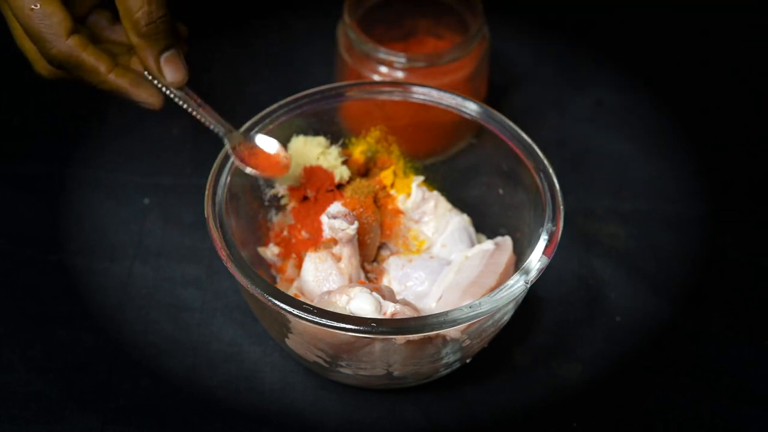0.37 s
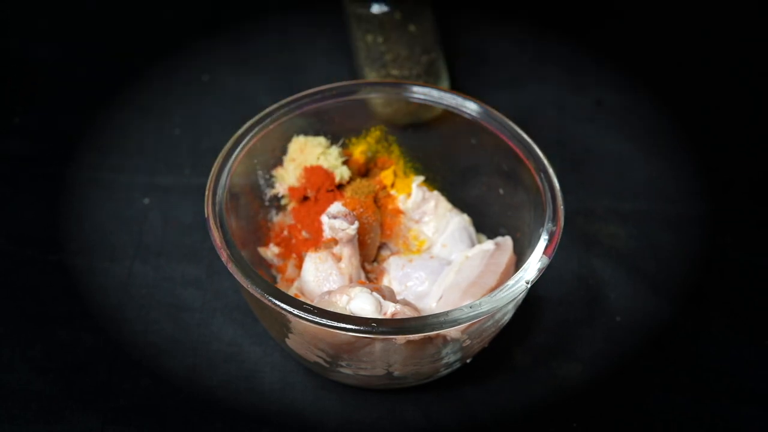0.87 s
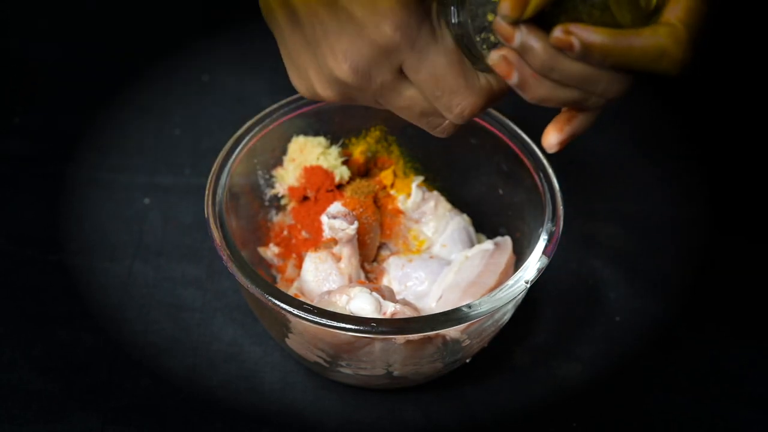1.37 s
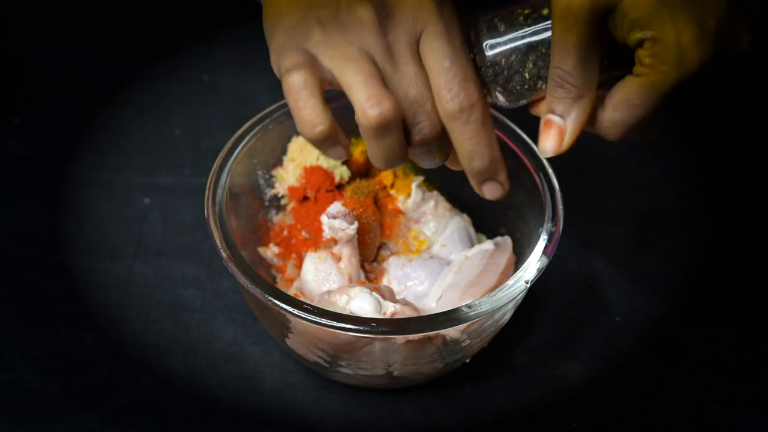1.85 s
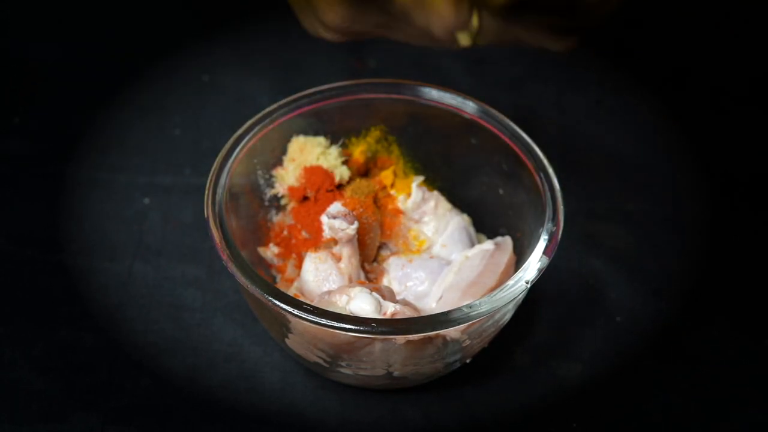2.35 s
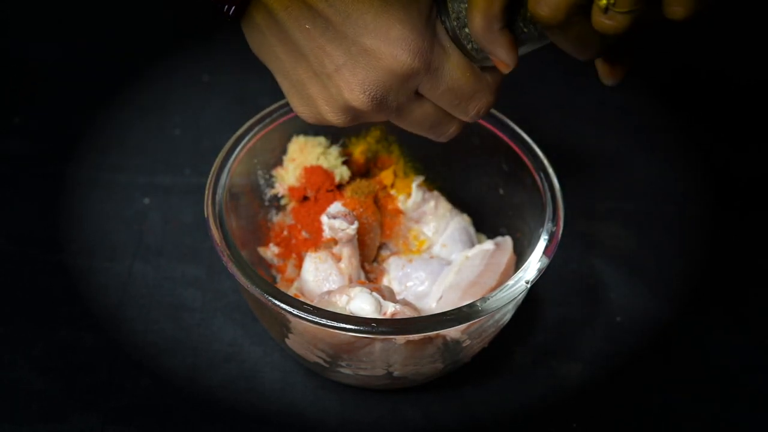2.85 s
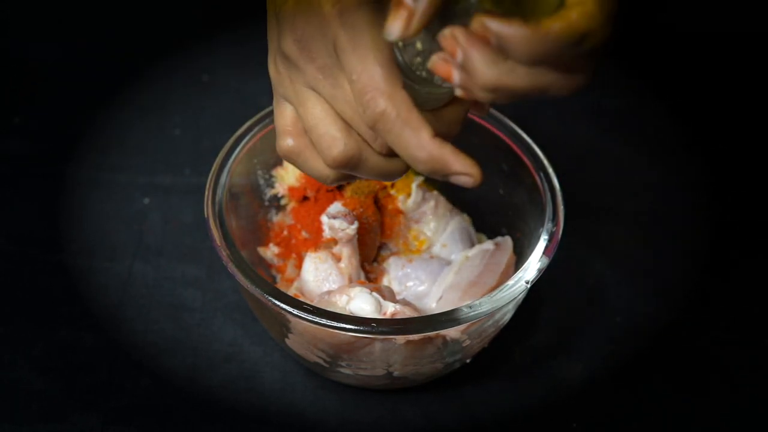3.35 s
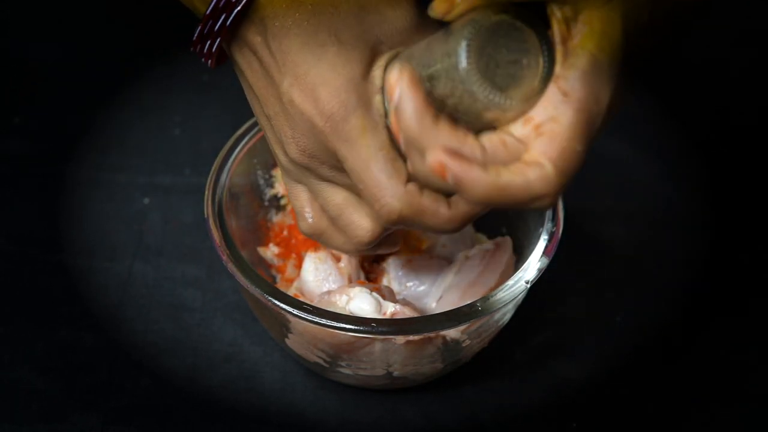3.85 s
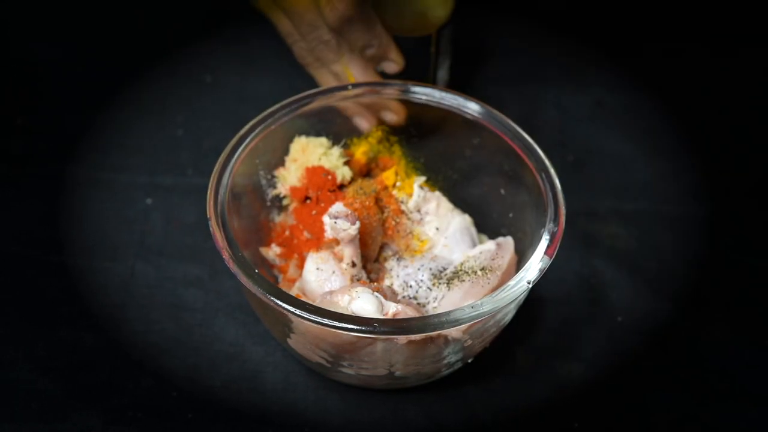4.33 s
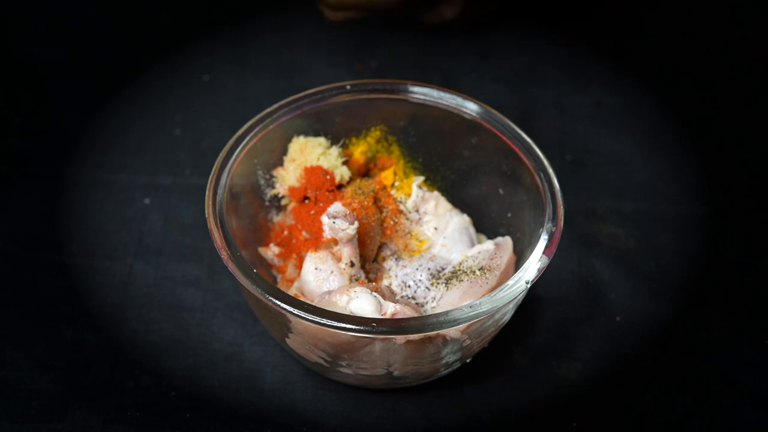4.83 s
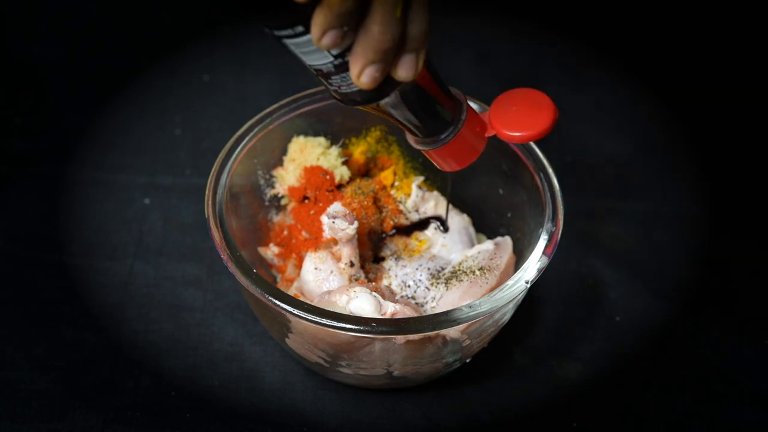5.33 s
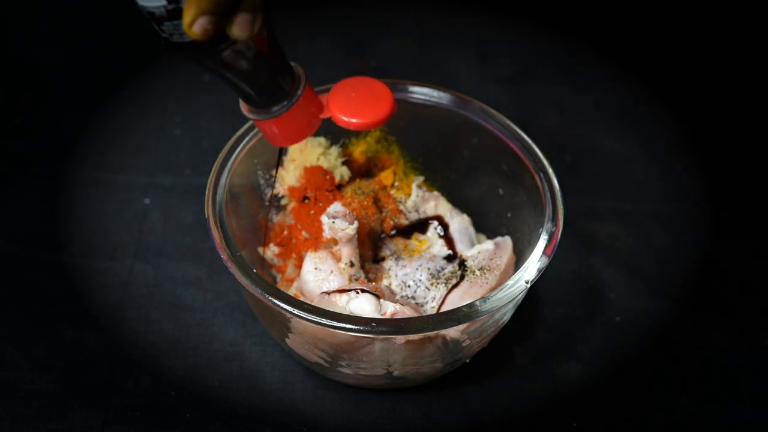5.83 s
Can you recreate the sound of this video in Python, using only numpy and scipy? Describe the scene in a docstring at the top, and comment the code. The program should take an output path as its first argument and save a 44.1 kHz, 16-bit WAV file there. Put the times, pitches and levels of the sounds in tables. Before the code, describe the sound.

In a bare echoing kitchen, glass taps, dull jar thuds, rattling mill knocks with gritty twists, a tiny hoot, cap snaps and a final bowl clink.

```python
"""Seasoning a bowl of meat in a bare, echoing kitchen, in short sections spliced together.
A spoon taps a glass rim, jars thud on the table, then a spice mill is knocked and twisted while bangles
jingle; a short hoot follows, a plastic cap snaps open, and late thuds end with a clink of the bowl.
Struck bodies ring in decaying modes, grains crack at random, the hoot is a few partials; drone and hiss,
both shaped noise, lie below throughout, and the loudest blows overload the input stage."""
import sys
import numpy as np
from scipy import signal
from scipy.fft import rfft, irfft, next_fast_len
from scipy.io import wavfile
from scipy.ndimage import uniform_filter1d

SR = 44100
rng = np.random.default_rng(int(sys.argv[2]) if len(sys.argv) > 2 else 0)


def voltage_ratio(level):
    """Linear amplitude factor for a level in decibels (scalar or array-like)."""
    return 10 ** (np.asarray(level, float) / 20)


def pcm_store(signal):
    """Save signal as 16-bit PCM."""
    levels = np.round(np.clip(np.atleast_2d(signal), -1, 1) * 32767)
    wavfile.write(sys.argv[1], SR, levels.astype(np.int16).T)


N = 273420

# In all blow tables, tilt lifts the high modes (harder contact) and focus lifts the middle ones.
# Knocks on the mill. Each row: time in seconds, level in dB, tilt in dB, focus in dB.
MILL_KNOCKS = [(1.346, -15.5, -5, 8), (1.364, 0.5, -1, 2), (1.434, 6, 4.5, 8.5), (1.449, -1, 1.5, 1),
               (2.053, -11.5, -12, 9), (2.0785, -8.5, -14, 14), (2.102, 5, -1.5, -2.5),
               (2.154, -6.5, 7.5, -0.5), (2.164, 8, -7.5, 9.5), (2.192, 4, 1, -3), (2.2005, -5.5, -10, 1.5),
               (2.236, -1, -6, -2), (2.687, -10.5, 0.5, 13), (2.7235, -9, -3.5, -8.5), (2.731, -2, -4, 3.5),
               (2.782, -16, -12.5, 10), (2.843, -11, -7, -3.5), (3.381, -25, -5, -22),
               (3.454, -14, -2.5, -3.5), (3.489, -3, -7.5, -3), (3.546, -15.5, 0, -5),
               (3.5632, -6.5, 12.5, 11), (3.723, -8.5, -3.5, -9.5), (3.805, 2, 10, -1.5)]
# Modes of the mill. Each row: frequency in Hz, level in dB, t60 in seconds.
MILL_MODES = [(950, 1, 0.012), (1695, 1.5, 0.0061), (2054, -0.5, 0.0085), (2570, -1.5, 0.0048),
              (3270, -6.5, 0.0046), (4255, -7, 0.00217), (5100, -7, 0.0062), (6273, -1, 0.0061),
              (7465, -1, 0.0043), (8340, 1.5, 0.0033), (9330, -3.5, 0.0084), (11340, -5.5, 0.001),
              (14250, 4.5, 0.0046), (14870, -1.5, 0.0033)]
# Average excitation by a knock. Each row: frequency in Hz, level in dB.
MILL_REACH = [(1000, -14.5), (2200, -1), (6200, 0.5), (13000, -10)]


def mill_knocks():
    """A knock rings the mill; its loose parts rebound and the grip detunes its modes."""
    return struck(MILL_KNOCKS, MILL_MODES, MILL_REACH, crack_db=-3, scatter=0.02, rattle_s=0.0022)


# Twists of the mill. Each row: start in seconds, hold in seconds, level in dB.
TWISTS = [(1.80, 0.01, -52), (2.09, 0.022, -42.5), (2.198, 0.34, -45), (2.726, .06, -35),
          (2.846, 0.0145, -34.5), (2.973, 0.077, -50.5), (3.386, 0.061, -46), (3.729, 0.093, -36.5)]
# Average excitation of the mill by a grain. Each row: frequency in Hz, level in dB.
GRAIN_REACH = [(1000, -.5), (2200, 0), (6200, -6), (13000, -0.5)]
GRAINS_PER_S = 500
TWIST_RISE_DB_PER_S, TWIST_FALL_DB_PER_S = 598, 349


def grinding():
    """Grains of uneven size crack at random and ring the mill in one of four ways; twists swell and die."""
    sizes = voltage_ratio(4.5 * np.minimum(rng.exponential(1, N), 4)) * rng.choice([-1, 1], N)
    clicks = sizes * (rng.random(N) < GRAINS_PER_S / SR)
    dealt = rng.integers(0, 4, N)
    grains = np.zeros(N)
    for k in range(4):
        ringing = ring(MILL_MODES, GRAIN_REACH, crack_db=0.85, crack_hz=10000, scatter=0.049, split=0)
        grains += signal.fftconvolve(clicks * (dealt == k), ringing)[:N]
    effort = sum(voltage_ratio(swell(*twist, TWIST_RISE_DB_PER_S, TWIST_FALL_DB_PER_S)) for twist in TWISTS)
    return effort * grains / grains.std()


# Taps of the spoon. Each row: time in seconds, level in dB, tilt in dB, focus in dB.
SPOON_TAPS = [(0.115, -7.5, -3, -1), (0.139, -9, -5, -18.5), (0.283, 7.5, 1.5, 7), (0.457, 7.5, 0.5, -2)]
# Pitches of the glass rim. Each entry: frequency in Hz.
GLASS_HZ = [899, 2153, 3925, 6113, 7500, 8656, 9700, 10150, 10790, 11621, 12600, 13300, 14840]
# Ringing at those pitches. Each row: level in dB, t60 in seconds.
GLASS_RINGING = [(-13.5, .6), (0, 0.18), (2, 0.088), (-0.5, 0.16), (-2, 0.0075), (0, 0.1), (-1, 0.005),
                 (-7.5, 0.06), (-6, 0.099), (-6, 0.15), (0.5, 0.0046), (-17.5, 0.03), (-12.5, 0.13)]
# Average excitation by a tap. Each row: frequency in Hz, level in dB.
SPOON_REACH = [(2200, -6.5), (3900, -1.5), (6100, -4), (11000, 2)]


def spoon_taps():
    """A tap rings the glass rim, whose split modes beat."""
    return struck(SPOON_TAPS, np.column_stack([GLASS_HZ, GLASS_RINGING]), SPOON_REACH, crack_db=-5, split=0.003)


# Jars set on the table. Each row: time in seconds, level in dB, tilt in dB, focus in dB.
THUDS = [(0.73, -5.5, -1, -1.5), (0.884, -1.5, -2, -2), (4.165, -15, -6.5, 3), (5.9765, -6.5, 3, 15),
         (6.009, -13, 5, 11)]
# Modes of the table. Each row: frequency in Hz, level in dB, t60 in seconds.
TABLE_MODES = [(129.6, -7.5, 0.075), (222, -6.5, 0.095), (306.7, 2, 0.094), (410.7, 6, 0.053),
               (637, 9.5, 0.016), (893, 6.5, 0.013), (1525, 9, 0.004), (2446, 7.5, 0.0021),
               (4330, 6, 0.00051)]
# Average excitation by a thud. Each row: frequency in Hz, level in dB.
THUD_REACH = [(300, -12), (800, -6.5), (2200, 3.5)]


def thuds():
    """A jar excites the low modes of the table with a dull crack."""
    return struck(THUDS, TABLE_MODES, THUD_REACH, crack_db=-13, crack_hz=3500, scatter=0.03)


# Snaps of the cap. Each row: time in seconds, level in dB, tilt in dB, focus in dB.
CAP_SNAPS = [(4.6995, 2.5, -5.5, -0.5), (4.860, 6.5, -7.5, 8.5), (4.9128, 11, 7.5, -3)]
# Modes of the plastic cap. Each row: frequency in Hz, level in dB, t60 in seconds.
CAP_MODES = [(1170, 1, 0.0051), (1585, -8.5, 0.023), (2400, -0.5, 0.0024), (3600, -3.5, 0.0029),
             (4575, 1.5, 0.0065), (5000, -0.5, 0.0078), (5524, 0, 0.0077), (6450, -6.5, 0.011),
             (7200, -2, 0.0027), (9800, -1, 0.014), (13000, -12.5, .008)]
# Average excitation by a snap. Each row: frequency in Hz, level in dB.
CAP_REACH = [(1500, -11), (4500, -3), (5700, -6.5), (10000, -23)]


def cap_snaps():
    """A snap sets off the short modes of the plastic cap."""
    return struck(CAP_SNAPS, CAP_MODES, CAP_REACH, crack_db=-6, scatter=0.018)


# Strokes of the bangles. Each row: time in seconds, level in dB, tilt in dB, focus in dB.
JINGLES = [(0.892, -20.5, -2, -2.5), (1.8113, -17.5, -9, 8.5), (1.8632, -21.5, -14.5, 12),
           (2.386, -21, 19.5, -3), (2.5304, -17, -6.5, 7.5), (2.7915, -10.5, -4, -13),
           (2.806, -13.5, -2, -3.5), (2.88, -16, 1, -14), (3.1111, -24.5, -12, 15), (3.2051, -22, -12, 11),
           (3.7778, -20.5, 12, -8), (3.963, -33.5, 1, 13), (4.3021, -32.5, -1.5, -17)]
# Modes of the bangles. Each row: frequency in Hz, level in dB, t60 in seconds.
BANGLE_MODES = [(6370, 3.5, 0.0037), (9240, -5.5, 0.0123), (13470, -4.5, 0.035), (14830, -3, 0.03),
                (15400, -4.5, 0.024)]
# Average excitation by a jingle. Each row: frequency in Hz, level in dB.
BANGLE_REACH = [(9200, -1), (13400, 3), (14600, -14)]


def jingles():
    """Bangles ring in a few high modes under a strong crack."""
    return struck(JINGLES, BANGLE_MODES, BANGLE_REACH, crack_db=1.5, scatter=0.0041)


# Clink of the bowl. Each row: time in seconds, level in dB, tilt in dB, focus in dB.
BOWL_CLINKS = [(6.0215, -6.5, 1, 0)]
# Modes of the bowl. Each row: frequency in Hz, level in dB, t60 in seconds.
BOWL_MODES = [(2640, -7, 0.014), (4840, -6, 0.009), (6350, -4, 0.0049), (7380, -10, .004),
              (8970, -15.5, 0.006), (12120, -11.5, .006), (14800, -18, .008), (15000, -19, .008)]
# Average excitation by a clink. Each row: frequency in Hz, level in dB.
BOWL_REACH = [(2700, 0), (14000, 0)]


def bowl_clinks():
    """A clink rings the short, high modes of the bowl."""
    return struck(BOWL_CLINKS, BOWL_MODES, BOWL_REACH, crack_db=-2)


CRACK_FOLLOWS_TILT = 0.27   # dB per dB: a softer contact cracks less


def struck(blows, modes, reach, crack_db, crack_hz=13000, scatter=0, split=0, rattle_s=0):
    """Every blow rings the same body; its tilt and focus colour the modes."""
    out = np.zeros(2 * N)
    hz, usual_db = np.transpose(reach)
    place = np.linspace(-1, 1, len(hz))
    for s, level_db, tilt_db, focus_db in blows:
        colour = list(zip(hz, usual_db + tilt_db * place + focus_db * (1 - place ** 2)))
        blow_crack_db = crack_db + CRACK_FOLLOWS_TILT * min(tilt_db, 0)
        wave = ring(modes, colour, blow_crack_db, crack_hz, scatter, split)
        if rattle_s:
            wave = rattle(wave, rattle_s)
        out[round(s * SR):][:len(wave)] += voltage_ratio(level_db) * wave
    return out[:N]


def ring(modes, colour, crack_db, crack_hz, scatter, split):
    """Decaying modes plus the short crack of contact; a small body sends out little below its modes."""
    hz, level_db, t60_s = np.transpose(modes)
    t = np.arange(int(max(t60_s) * SR) + 400) / SR
    gains = voltage_ratio(level_db + at_hz(colour, hz)) * (-1) ** np.arange(len(hz))
    hz = hz * (1 + scatter * rng.standard_normal(len(hz)))
    turns = 2 * np.pi * np.outer(hz, t)
    # uneven round bodies split their modes, which then beat
    beats = 1 + 0.8 * np.cos(split * rng.random((len(hz), 1)) * turns)
    body = gains @ (np.sin(turns) * beats * voltage_ratio(-60 * np.outer(1 / t60_s, t)))
    crack = signal.lfilter(*signal.butter(2, crack_hz, fs=SR), rng.standard_normal(len(t)))
    wave = body / np.abs(body).max() + voltage_ratio(crack_db - 60 * t / 0.0028) * crack
    return signal.sosfilt(signal.butter(3, 0.94 * hz[0], "high", fs=SR, output="sos"), wave)


REBOUND = 0.72   # all-pass gain: the higher, the more the first touch stands out


def rattle(wave, longest_s):
    """Loose parts rebound: two all-passes spread the blow in time and keep its colour."""
    for gap in (longest_s * SR * rng.uniform(0.3, 1, size=2)).astype(int):
        touch = np.r_[REBOUND, np.zeros(gap), -1]
        wave = signal.lfilter(touch, -touch[::-1], wave)
    return wave


def swell(start_s, hold_s, level_db, rise_db_per_s, fall_db_per_s):
    """Level in dB that climbs to its top, holds and sinks."""
    t = np.arange(N) / SR
    rise = rise_db_per_s * np.maximum(start_s - t, 0)
    return level_db - rise - fall_db_per_s * np.maximum(t - start_s - hold_s, 0)


def at_hz(points, hz):
    """Reads a (Hz, value) table on a log-frequency axis."""
    points_hz, values = np.array(points).T
    return np.interp(np.log(hz), np.log(points_hz), values)


# Partials of the hoot. Each row: multiple of HOOT_HZ, level in dB.
HOOT_PARTIALS = [(2, 0), (3, -13), (4, -5.5), (5, -9)]
HOOT_HZ, HOOT_WAVER = 583, 0.009   # waver: share of the pitch
HOOT_START_S, HOOT_HOLD_S, HOOT_DB = 4.07, 0.15, -46
HOOT_RISE_DB_PER_S, HOOT_FALL_DB_PER_S = 2001, 333


def hoot():
    """A few partials of one slightly wavering pitch."""
    waver = uniform_filter1d(rng.standard_normal(N), size=900) * 30   # back to about unit rms
    phase = 2 * np.pi * np.cumsum(HOOT_HZ * (1 + HOOT_WAVER * waver)) / SR
    tone = sum(voltage_ratio(db) * np.sin(round(k) * phase) for k, db in HOOT_PARTIALS)
    return voltage_ratio(swell(HOOT_START_S, HOOT_HOLD_S, HOOT_DB, HOOT_RISE_DB_PER_S, HOOT_FALL_DB_PER_S)) * tone


# Splices between the sections. Each entry: time in seconds.
SPLICES_S = [.035, .702, 1.32, 2.67, 4.062, 4.6, 5.28, 5.955]
# Sections, each with its own room level, lean, drone and hiss. Each row: room gain in dB, left-right lean in
# dB, drone level in dB rms, hiss level in dB rms.
SECTIONS = [(-1.5, .4, -42.5, -49.5), (-2.5, 0, -46.5, -77), (-5, 0, -44.5, -71.5), (-2, -1, -45.5, -47),
            (-2.5, -0.8, -48, -45.5), (-1, -0.3, -40.5, -69.5), (-4.5, -0.3, -41.5, -45),
            (2, 1.1, -55.5, -39.5), (1.5, -1, -49, -58)]
# Spectrum of the dull drone. Each row: frequency in Hz, relative density in dB.
DRONE_COLOUR = [(30, -17), (200, -20), (400, -16), (800, -1), (1500, -0.5), (3000, -11), (6000, -19.5),
                (16000, -35)]
# Spectrum of the brighter hiss. Each row: frequency in Hz, relative density in dB.
HISS_COLOUR = [(40, -21.5), (250, -25.5), (500, -15.5), (900, -4), (2000, -3.5), (3400, -9), (6200, -17),
               (7300, -10.5), (8600, -17.5), (16000, -35)]


def drone_and_hiss():
    """Two coloured noises whose levels hold through a section and step at each splice."""
    out = np.zeros((2, N))
    section = np.searchsorted(SPLICES_S, np.arange(N) / SR)
    size = next_fast_len(N)
    for colour, level_db in zip((DRONE_COLOUR, HISS_COLOUR), np.transpose(SECTIONS)[2:]):
        hz, noise = stereo_noise(size)
        shaped = irfft(noise * voltage_ratio(at_hz(colour, hz)), size)[:, :N]
        out += uniform_filter1d(voltage_ratio(level_db[section]), size=300) * shaped / shaped.std()
    return out


# Likeness of the two channels. Each row: frequency in Hz, correlation from 0 to 1.
LIKENESS = [(250, 1), (500, 0.93), (1000, 0.7), (2000, 0.043), (8000, 0.0092)]


def stereo_noise(size):
    """Spectra of two white noises, alike in the bass and nearly unrelated in the treble."""
    hz = np.maximum(np.arange(size // 2 + 1) * SR / size, 10)
    mid, side = rfft(rng.standard_normal((2, size)))
    alike = np.clip(at_hz(LIKENESS, hz), 0, 1)
    pair = np.sqrt(1 + alike) * mid + np.sqrt(1 - alike) * side * [[1], [-1]]
    return hz, pair / np.sqrt(2)


# Decay of the room. Each row: frequency in Hz, t60 in seconds.
ROOM_T60 = [(100, 0.57), (400, 0.7), (1400, 0.54), (5000, 0.53), (9000, 0.49), (15000, 0.36)]
# Early echoes. Each row: delay in seconds, level in dB.
ECHOES = [(.0078, -3), (.013, -12)]
TAIL_DB, BUILD_UP_S = -23.5, 0.005


def room_response():
    """A few early echoes, plus noise that builds up and dies at its own rate in each octave."""
    size = SR
    t = np.arange(size) / SR
    hz, noise = stereo_noise(size)
    tail = np.zeros((2, size))
    for centre_hz in 62.5 * 2.0 ** np.arange(9):
        band = np.clip(1 - np.abs(np.log2(hz / centre_hz)), 0, 1)
        tail += irfft(noise * band, size) * voltage_ratio(-60 * t / at_hz(ROOM_T60, centre_hz))
    response = voltage_ratio(TAIL_DB) * tail * (1 - np.exp(-t / BUILD_UP_S))
    for k, (delay_s, db) in enumerate(ECHOES):
        response[:, round(delay_s * SR)] += voltage_ratio(db) * np.roll([1, 0.85], k)   # sides alternate
    return response


def scene():
    """All near sources ring in the room; each splice cuts off the tail of the section before."""
    near = (mill_knocks() + grinding() + spoon_taps() + thuds() + cap_snaps() + jingles()
            + bowl_clinks() + hoot())
    out, room = drone_and_hiss(), room_response()
    edges = [0] + [round(s * SR) for s in SPLICES_S] + [N]
    for a, b, (room_db, lean_db, *_) in zip(edges, edges[1:], SECTIONS):
        fade = np.minimum((b - np.arange(a, b)) / 150 + (b == N), 1)   # the last section is not faded
        wet = voltage_ratio(room_db) * signal.fftconvolve(near[None, a:b], room, axes=1)[:, :b - a]
        lean = voltage_ratio(lean_db * np.array([[0.5], [-0.5]]))
        out[:, a:b] += (near[a:b] + wet) * fade * lean
    return out


def roll_off(x):
    """The treble ends steeply here."""
    return signal.sosfilt(signal.butter(12, 16220, fs=SR, output="sos"), x)


LOPSIDED = 0.053   # the input stage bends one half-wave more than the other


def record(dry):
    """The input stage adds a squared share of the sound, without its offset, and clips at full scale."""
    squared = np.clip(dry, -1, 1) ** 2
    bent = dry + LOPSIDED * signal.lfilter(*signal.butter(1, 30, "high", fs=SR), squared)
    return roll_off(np.clip(bent, -1, 1))


dry = scene()
out = record(dry)
pcm_store(out)
```